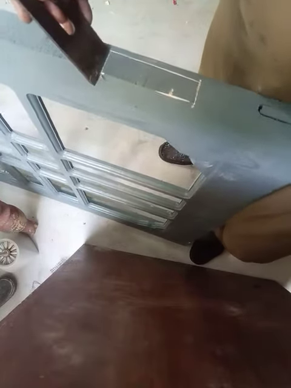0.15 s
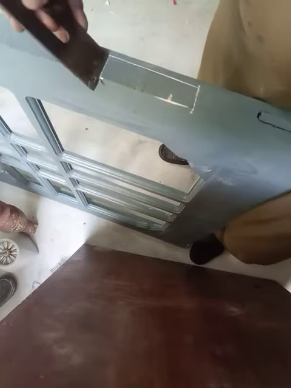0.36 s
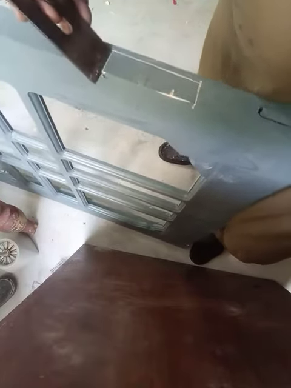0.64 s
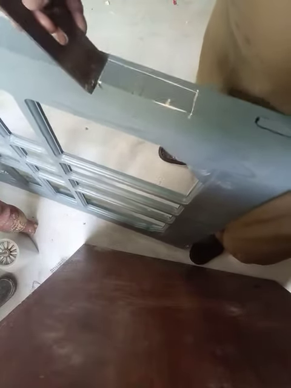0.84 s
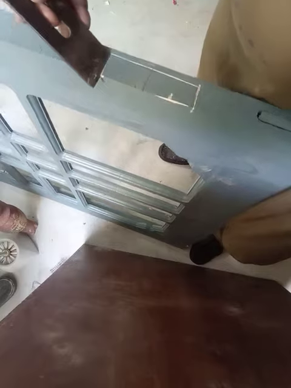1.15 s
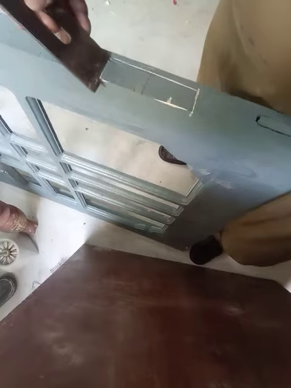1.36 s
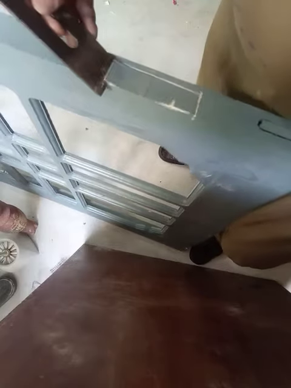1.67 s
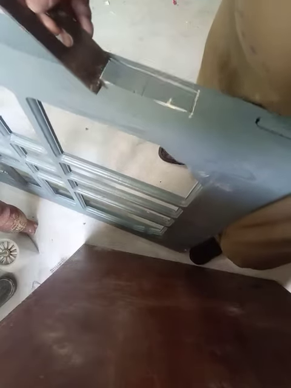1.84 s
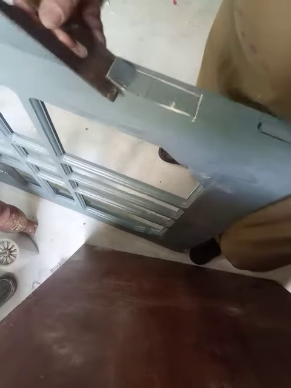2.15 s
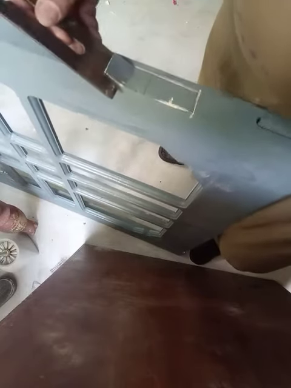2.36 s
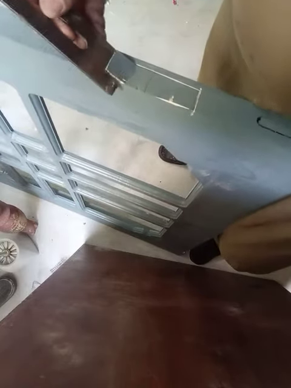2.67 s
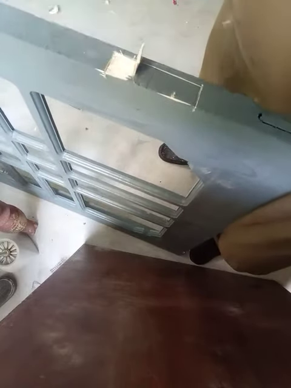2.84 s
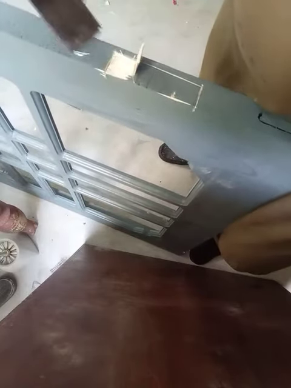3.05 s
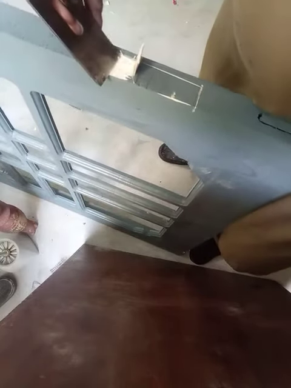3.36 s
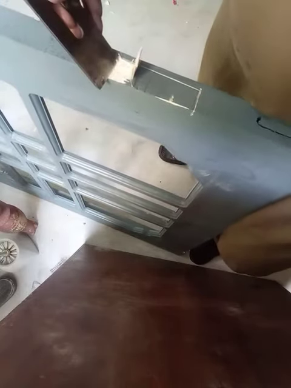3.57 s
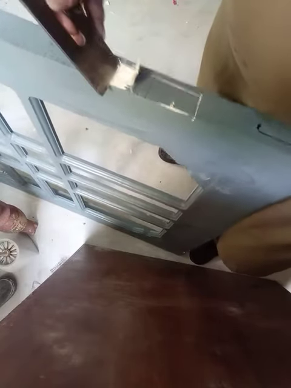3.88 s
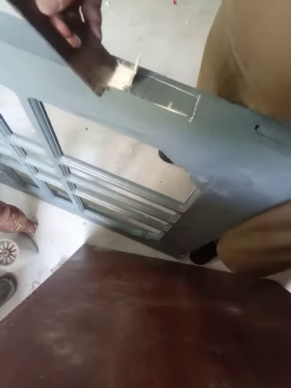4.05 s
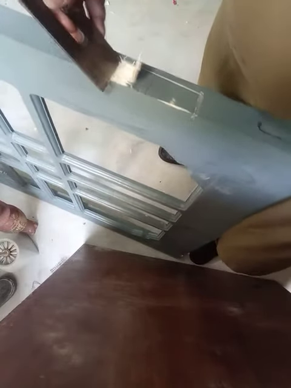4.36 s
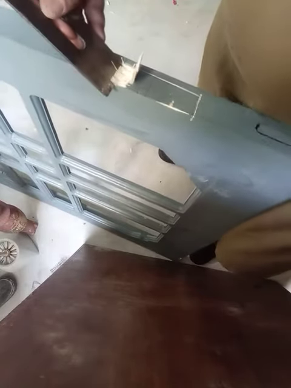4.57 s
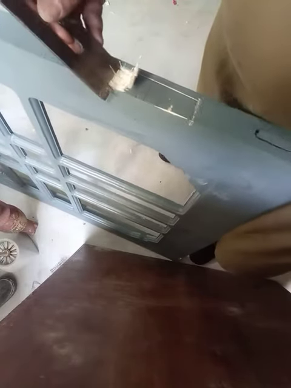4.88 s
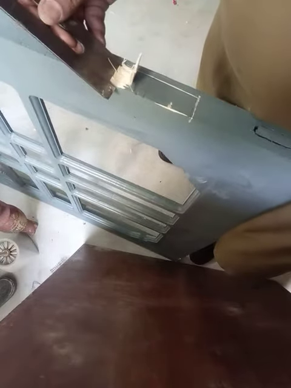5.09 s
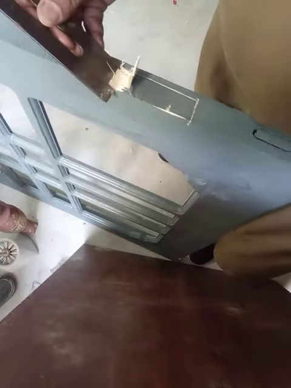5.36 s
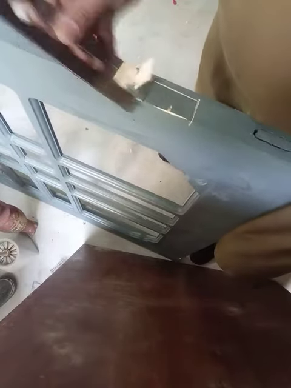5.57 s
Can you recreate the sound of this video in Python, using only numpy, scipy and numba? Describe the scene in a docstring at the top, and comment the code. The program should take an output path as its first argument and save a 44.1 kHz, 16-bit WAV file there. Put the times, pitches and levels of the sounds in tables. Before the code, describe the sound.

Sharp metallic hammer strikes chop a chisel into a wooden door edge in a reverberant workshop, broken by a brief crackle and light rubbing.

```python
"""First comes the ring of a chisel blow already struck, then a hammer drives the broad steel blade into a wooden door's edge.
Each blow rings blade, hammer face and door as short decaying tones; a dense tail carries the ring on in a hard-walled workshop.
In the pause a wood chip cracks off in clicks, and the blade is slid to its new place with strokes of grainy filtered noise.
A faint noise hush lies beneath; the phone an arm's length away colours it all and its gain control holds loud sound level."""
import sys
import numpy as np
from scipy import signal
from scipy.fft import rfft, irfft
from scipy.io import wavfile
from scipy.ndimage import uniform_filter1d, minimum_filter1d
from numba import njit

SR = 44100
rng = np.random.default_rng(int(sys.argv[2]) if len(sys.argv) > 2 else 0)


def int16_out(signal):
    """Quantize to a 16-bit WAV file."""
    q = np.round(np.clip(np.atleast_2d(signal).T, -1, 1) * 32767)
    wavfile.write(sys.argv[1], SR, q.astype(np.int16))


N = 252252
LEAD = SR // 2  # samples of run-up, so that a blow before time zero is already ringing

# Hammer blows: (time [s], strength [dB], then gains on top of that strength: blade ring [dB], door slab [dB],
#  panel and rail [dB], door edge [dB], panes [dB], blade bending [dB], blade twist [dB], sparkle [dB];
#  share of the usual tail t60 [ratio])
BLOWS = [(-.14, -2.5, 1.5, 0.3, 4, 1, -2.5, 6, 9.5, -9, 1.07),
         (0.3154, 1.5, -0.5, 3.5, 3.5, -1.5, -7, 9, 6, 4, 1.048),
         (.802, 1.5, -1.5, -5, -3, -1.2, 3.5, -7, -0.8, 4.5, 1.087),
         (1.277, 1.5, -0.8, -2.5, 0.4, -1, -5, 3.5, 0.5, 0.5, 1.053),
         (1.7373, -1, -0.5, -1.5, -1, -1.6, -11, 6, -3, 1.5, 1.086),
         (2.208, 1.8, -4.8, -13.5, -7, -2.1, -3.8, 3.5, -1, -1.7, 1.058),
         (3.954, -0.26, -0.3, -3, -1.5, 0.4, 1.6, 4, 0.3, 7.5, 1.012),
         (4.449, 3.5, -3, -1, -0.5, -2, -2.5, -0.9, -4, 4, 1.045),
         (4.991, 2.5, -2.5, 0, -12, 1.5, -7, 8, 0.7, -14.5, 1.055),
         (5.629, -3, -5.5, -6, -4, -5.5, -8, 3.5, -3, -6, 0.99)]
# What a blow rings, one table a part, each: (frequency [Hz], relative level [dB], t60 [s])
# The blade's main ring
BLADE_RING = [(5150, 7.5, 0.008), (5423, 4.5, 0.014)]
# The chisel's tang
TANG = [(3748, 0, 0.0062), (4380, -8.5, 0.0073)]
# The door slab
SLAB = [(70, -20, 0.037), (126, -16, 0.029), (229, -13.5, 0.035)]
# The door panel
PANEL = [(322, -23, 0.046), (441, -7.5, 0.015), (588.6, -17.5, 0.031)]
# The door rail
RAIL = [(1202, -9, 0.011), (1590, -14, 0.018)]
# The door edge
EDGE = [(786.5, -12, 0.022), (970, -9, 0.018)]
# The door's bars
BARS = [(1901, -3.5, 0.01), (2236, -4.5, 0.012)]
# The hammer face
HAMMER_FACE = [(6690, -2.5, 0.013), (7356, -5, 0.011), (7690, -4, .01)]
# The door's panes
PANES = [(2460, -7, 0.015), (2670, -5.5, 0.013)]
# The blade bending
BLADE_BEND = [(2930, -7, 0.012), (3132, -4.5, 0.012)]
# The blade twisting
BLADE_TWIST = [(5825, -1.3, 0.013), (6250, -0.9, 0.012)]
# The highest sparkle of the blow
SPARKLE = [(9940, -26, 0.011), (15200, -4.5, .005), (15450, -8.5, 0.005)]
# The clearest snaps of wood fibre and ticks of the blade: (time [s], dry peak level [dB])
SNAPS = [(2.6748, -33), (2.8074, -50), (2.8212, -27), (2.8250, -22), (2.8314, -26), (2.8350, -23),
         (2.8518, -26), (3.2894, -50), (3.3044, -34), (3.9114, -58)]
# Modes of a snapping fibre: (frequency [Hz], relative level [dB], t60 [s])
FIBRE = [(499.5, -32, 0.017), (1530, -29, 0.0059), (3410, -12, 0.0074), (5570, -10.5, 0.0051),
         (6500, 0, 0.0032), (10270, -6, 0.0043), (16140, -7.5, 0.0049)]
# Strokes of the blade over the wood: (start [s], hardest moment [s], dull part [dB], thin part [dB])
STROKES = [(3.006, 3.045, -71, -94), (3.142, 3.23, -64, -82), (3.237, 3.32, -55.5, -65),
           (3.44, 3.46, -71, -70), (3.522, 3.55, -70.5, -84), (3.818, 3.853, -68.5, -87)]
# Dull rubbing through the door: (frequency [Hz], width [Hz], relative level [dB])
RUB_DULL = [(162.3, 76, -1.5), (333, 116, -1.5), (657, 170, -1.5), (1230, 100, -16.5)]
# Thin rubbing from the blade: (frequency [Hz], width [Hz], relative level [dB])
RUB_THIN = [(1700, 210, 5), (2270, 250, -1), (3280, 190, -4), (3880, 420, -5.5), (5650, 400, -4),
            (6200, 300, -8.5), (14400, 670, -16.5)]
# Panes and panels with the room behind them: (frequency [Hz], usual t60 [s], relative level [dB])
ROOM = [(60, 0.9, -13), (147, 0.66, -5), (404, 0.61, -7), (980, 0.59, -2.5), (2170, 0.58, -3),
        (3064, 0.5, -2.5), (5605, 0.4, 3), (7870, 0.27, -7), (11600, 0.41, -7.5), (15000, 0.068, -3.5)]
# Colour of the shop's hush: (frequency [Hz], relative level [dB])
HUSH_COLOUR = [(30, -14), (80, -3.5), (200, -10.5), (400, -20.5), (700, -15), (1100, -30.5), (3000, -31),
               (6500, -32), (9000, -50.5), (13000, -51), (15200, -45.5)]
# Microphone colour: (frequency [Hz], gain [dB])
MIC = [(30, -27), (80, -2), (200, -3), (6000, 1.5), (7800, 1.5), (9000, -9), (13000, -16), (14800, -4),
       (15700, -4), (16100, -20)]

# Blow: bite time constant [ms], force, crack and knock gains [dB]
BITE_MS, FORCE_DB, CRACK_DB, KNOCK_DB = 1.05, 7, -7.5, -13
CRACK_FADE_S, KNOCK_HZ, KNOCK_FADE_S = 0.0066, 230, 0.003
BLOW_TAIL_DB, CRACK_IN_TAIL_DB = -28.5, -3.5
# Late in the tail the phone's noise suppression seems to thin the weak bands between the strong ones
SUPPRESS_AFTER_S, SUPPRESS_DEPTH = 0.29, 0.58
# The chip tears off: many small fibres give way between these times
TEAR_START_S, TEAR_END_S, TEAR_FIBRES = 2.812, 2.866, 16
TEAR_DB, TEAR_SCATTER_DB = -28, 2
# Stroke slopes [dB/s]
DULL_SWELL_DB_S, DULL_FADE_DB_S = 89.5, 249
THIN_SWELL_DB_S, THIN_FADE_DB_S = 90, 350
LIGHT_T60_SHARE, LIGHT_TAIL_DB = 0.65, -29.5
GRAIN_DB, GRAIN_S = 2, 0.0015
HUSH_DB, MURMUR_HZ, MURMUR_DB = -73, 14, 2.5
HOLD_DB, RATIO, ATTACK_S, RELEASE_S = -21, 7.3, 0.012, 0.025
CEILING_DB, TOP_HZ = -2.6, 16600


def hammer():
    """Each blow rings every part, carries on in door and room, and sends a dull knock straight to the phone."""
    out = np.zeros(N + LEAD)
    t = np.arange(4096) / SR  # this length gives the 2049 bins that causal() takes
    for (s, strength_db, ring_db, slab_db, panel_db, edge_db, panes_db,
         bend_db, twist_db, sparkle_db, t60_share) in BLOWS:
        parts = ((BLADE_RING + TANG, ring_db), (SLAB, slab_db), (PANEL + RAIL, panel_db),
                 (EDGE, edge_db), (BARS + HAMMER_FACE, 0), (PANES, panes_db),
                 (BLADE_BEND, bend_db), (BLADE_TWIST, twist_db), (SPARKLE, sparkle_db))
        modes = np.vstack([undb(db) * ring(table, t) for table, db in parts])

        # the force builds while the edge bites into the wood
        force = undb(FORCE_DB + strength_db) * (1 - np.exp(-1000 * t / BITE_MS)) ** 2
        crack = undb(CRACK_DB) * force * np.exp(-t / CRACK_FADE_S)
        knock = undb(KNOCK_DB) * np.sin(2 * np.pi * KNOCK_HZ * t) * np.exp(-t / KNOCK_FADE_S)
        direct = force * (modes.sum(axis=0) + knock) + crack * rng.standard_normal(len(t))
        add(out, s - BITE_MS / 1000, direct)

        # the parts radiate in different directions, so the room adds their power, not their waves
        mode_power = np.sum(np.abs(rfft(force * modes)) ** 2, axis=0)
        crack_power = np.sum((undb(CRACK_IN_TAIL_DB) * crack) ** 2)
        log_gain = np.log(mode_power + crack_power) / 2

        # chisel and phone shift between blows, so the tail's fine pattern is new each time
        echo = undb(BLOW_TAIL_DB) * tail(t60_share)
        early = echo * np.exp(-(np.arange(len(echo)) / SR / SUPPRESS_AFTER_S) ** 2)
        relief = log_gain - uniform_filter1d(log_gain, size=150)
        thinned = log_gain + SUPPRESS_DEPTH * np.minimum(relief, 0)  # only the weak bands sink
        add(out, s, causal(early, log_gain) + causal(echo - early, thinned))
    return out


def snaps():
    """Each snap is a bright dry click of a millisecond or two; a patter of small ones fills the tear."""
    out, t = np.zeros(N + LEAD), np.arange(SR // 100) / SR
    place, size = rng.random(TEAR_FIBRES), rng.standard_normal(TEAR_FIBRES)
    times = TEAR_START_S + place * (TEAR_END_S - TEAR_START_S)
    # the patter is strongest in the middle of the tear
    levels_db = TEAR_DB + TEAR_SCATTER_DB * size + 20 * np.log10(np.sin(np.pi * place))
    for s, db in [*SNAPS, *zip(times, levels_db)]:
        modes = ring(FIBRE, t, detune=0.097, scatter_db=2.5)
        click = modes.sum(axis=0) * (1 - np.exp(-t / 0.0001))
        add(out, s, undb(db) * click / np.abs(click).max())
    return out


def slide():
    """Grainy rubbing: a dull part through the door and a thin one from the blade; each stroke swells, then fades."""
    t = (np.arange(N + LEAD) - LEAD) / SR
    grain = rng.standard_normal(len(t)) * undb(2.3 * rng.exponential(size=len(t)))
    dull, thin = rub(grain, RUB_DULL), rub(grain, RUB_THIN)
    out = np.zeros(len(t))
    for start, top, dull_db, thin_db in STROKES:
        before, after = np.maximum(top - t, 0), np.maximum(t - top, 0)
        dull_gain = undb(dull_db - DULL_SWELL_DB_S * before - DULL_FADE_DB_S * after)
        thin_gain = undb(thin_db - THIN_SWELL_DB_S * before - THIN_FADE_DB_S * after)
        out += (t > start) * (dull * dull_gain + thin * thin_gain)
    return out


def rub(grain, modes):
    """Grain heard through a set of resonant bands, scaled to rms 1."""
    bands = [undb(db) * unit(band(grain, hz, 1.6 * width / hz)) for hz, width, db in modes]
    return unit(sum(bands))


def room(x):
    """Light touches do not shake the door, so their tail is shorter and weaker than a blow's."""
    return x + undb(LIGHT_TAIL_DB) * signal.fftconvolve(x, tail(LIGHT_T60_SHARE))[:len(x)]


def tail(t60_share, build_s=0.00015, build_cycles=4.2):
    """A dense echo tail of noise bands that builds up fast, the bass later, each band fading at its own rate."""
    t = np.arange(SR * 2 // 3) / SR
    out = np.zeros(len(t))
    hz, t60, db = np.transpose(ROOM)
    # single echoes and rattles stand out as grain
    hold = int(GRAIN_S * SR)
    grain_db = GRAIN_DB * np.repeat(rng.standard_normal(len(t) // hold + 1), hold)[:len(t)]
    noise = unit(rng.standard_normal(len(t)) * undb(grain_db))
    for k, f in enumerate(50 * 2 ** np.arange(0, 8.5, 0.5)):  # half-octave bands
        place = np.log(f), np.log(hz)
        fade_db = np.interp(*place, db) - 60 * t / (t60_share * np.interp(*place, t60))
        build = 1 - np.exp(-t / (build_s + build_cycles / f))
        shifted = np.roll(noise, 999 * k)  # keeps the bands from moving together
        out += band(shifted, f, 0.5) * undb(fade_db) * build
    return out


def hush():
    """The shop's faint hush: coloured noise, wavering a little in level."""
    hold = int(SR / MURMUR_HZ)
    steps = np.repeat(rng.standard_normal(N // hold + 1), hold)
    waver = unit(uniform_filter1d(steps, hold)[:N])
    return undb(HUSH_DB + MURMUR_DB * waver) * unit(colour(rng.standard_normal(N), HUSH_COLOUR))


def ring(modes, t, detune=0.00053, scatter_db=0.0):
    """Decaying modes, one a row, each a little different in pitch, phase and (with scatter) size every time."""
    hz, db, t60 = np.transpose(modes)[:, :, None]
    pitch, phase, size = rng.standard_normal((len(modes), 3)).T[:, :, None]
    tones = np.sin(2 * np.pi * (hz * (1 + detune * pitch) * t + phase))
    return undb(db + scatter_db * size - 60 * t / t60) * tones


def undb(db):
    """Decibels to gain."""
    return 10 ** (np.asarray(db) / 20)


def unit(x):
    """Scaled to rms 1."""
    return x / np.sqrt(np.mean(x ** 2))


def add(out, s, x):
    """Mix x in at time s [s]."""
    i = int(s * SR) + LEAD
    out[i:i + len(x)] += x[:len(out) - i]


def band(x, hz, octaves):
    """Band-pass around hz."""
    edges = hz * 2 ** (-octaves / 2), min(hz * 2 ** (octaves / 2), 0.45 * SR)
    return signal.sosfilt(signal.butter(2, edges, "bandpass", fs=SR, output="sos"), x)


def colour(x, points):
    """Filter that follows (frequency [Hz], gain [dB]) points."""
    hz, db = np.transpose(points)
    grid = np.maximum(np.arange(2049) * SR / 4096, 1)
    log_gain = np.interp(np.log(grid), np.log(hz), db) * np.log(10) / 20
    return causal(x, log_gain)[:len(x)]


def causal(x, log_gain):
    """Filter with the given log gain on 2049 bins, with the least possible delay (minimum phase)."""
    cepstrum = irfft(log_gain)
    cepstrum[1:2048] *= 2  # fold the backward half onto the forward half
    cepstrum[2049:] = 0
    return signal.fftconvolve(x, irfft(np.exp(rfft(cepstrum))))


@njit
def follow(x, attack, release):
    """Level follower: quick up, slower down."""
    level, out = 0., np.empty(len(x))
    for i in range(len(x)):
        a = abs(x[i])
        level += (a - level) * (attack if a > level else release)
        out[i] = level
    return out


def scene():
    """Work at the door in its room, over the shop's faint hush."""
    work = hammer() + room(snaps() + slide())
    return (work[LEAD:] + hush())[None]


def record(dry):
    """Microphone colour, gain control that holds loud sound level, a peak limiter, and the top cut."""
    x = colour(dry[0], MIC)
    level = follow(x, 1 / (ATTACK_S * SR), 1 / (RELEASE_S * SR))
    x = x * np.minimum(1, undb(HOLD_DB) / (level + 1e-9)) ** (1 - 1 / RATIO)
    span = SR // 2000  # half a millisecond
    peak_gain = np.minimum(1, undb(CEILING_DB) / (np.abs(x) + 1e-9))
    x = x * uniform_filter1d(minimum_filter1d(peak_gain, size=2 * span), size=span)
    return signal.sosfilt(signal.ellip(10, 0.2, 90, TOP_HZ, fs=SR, output="sos"), x)[None]


dry = scene()
out = record(dry)
int16_out(out)
```